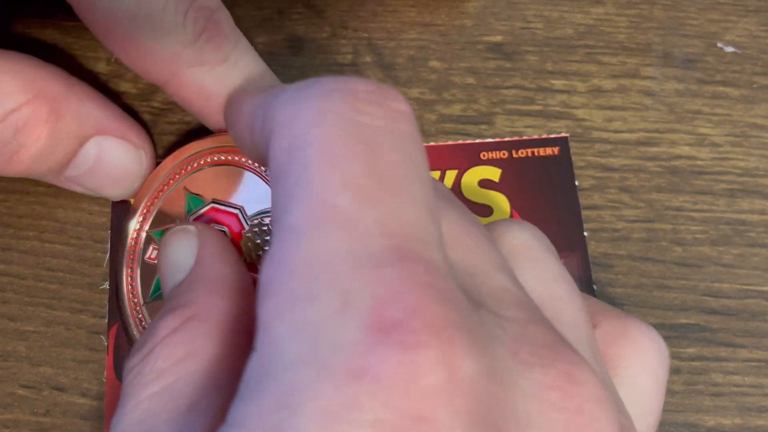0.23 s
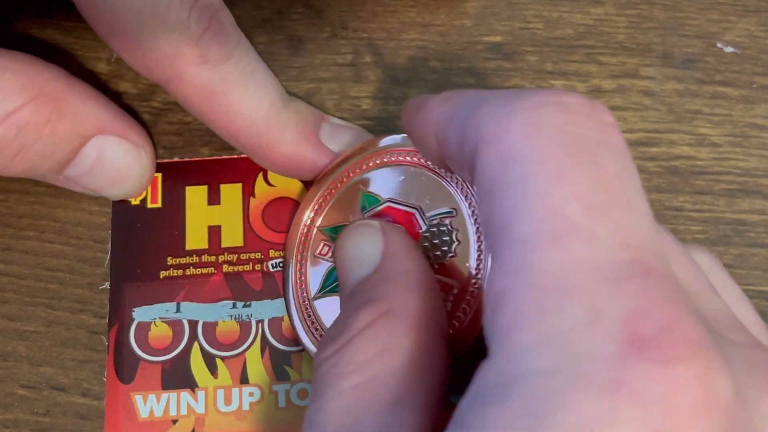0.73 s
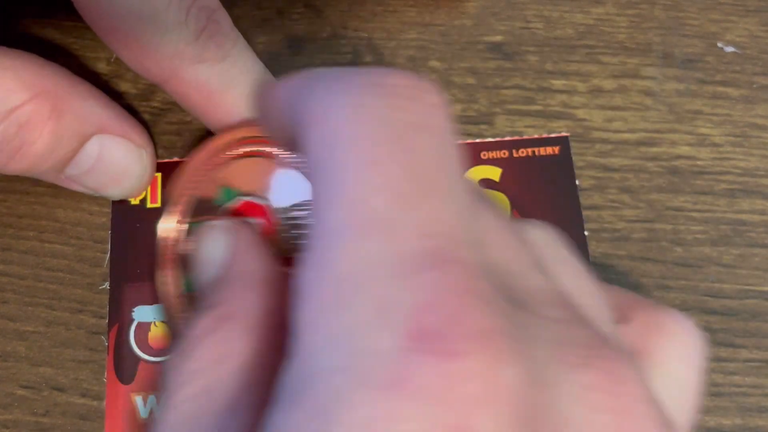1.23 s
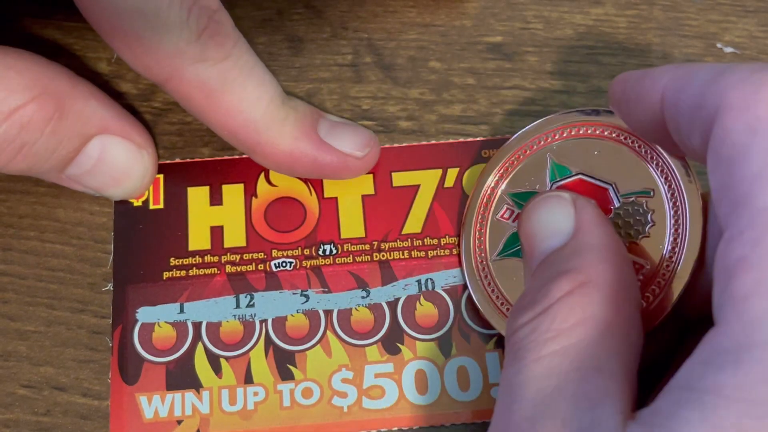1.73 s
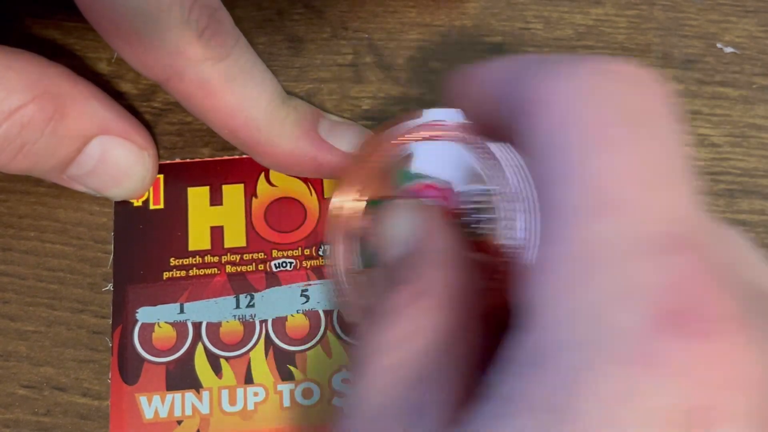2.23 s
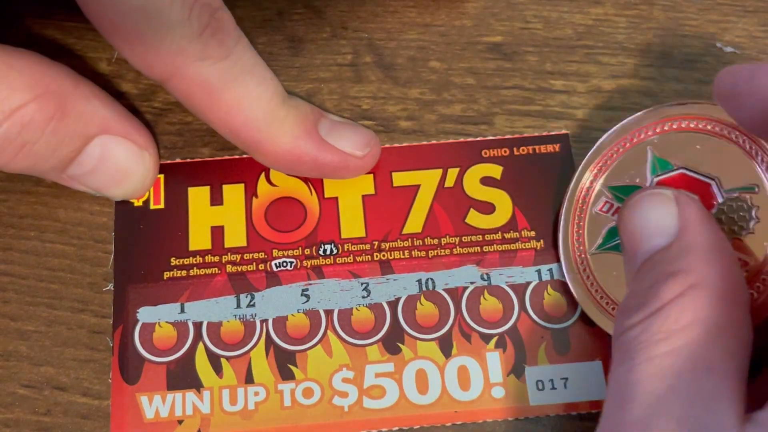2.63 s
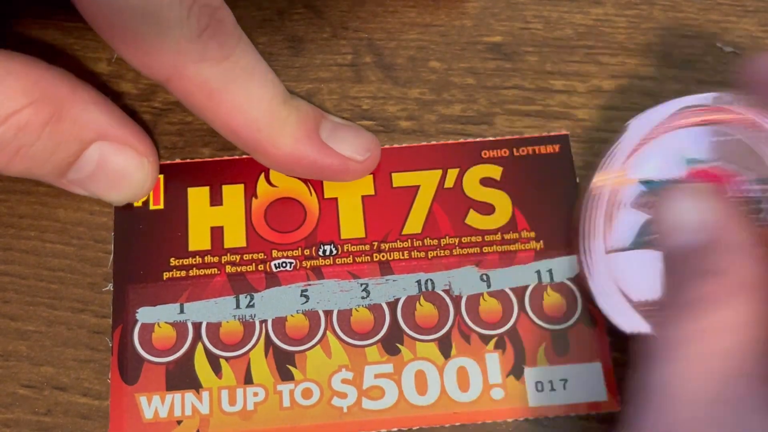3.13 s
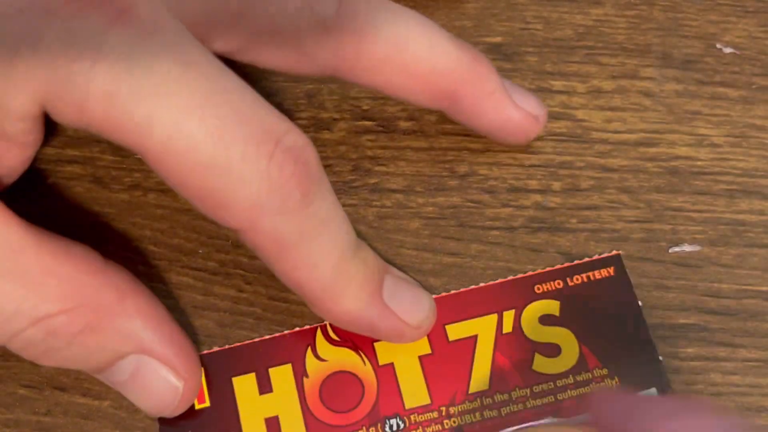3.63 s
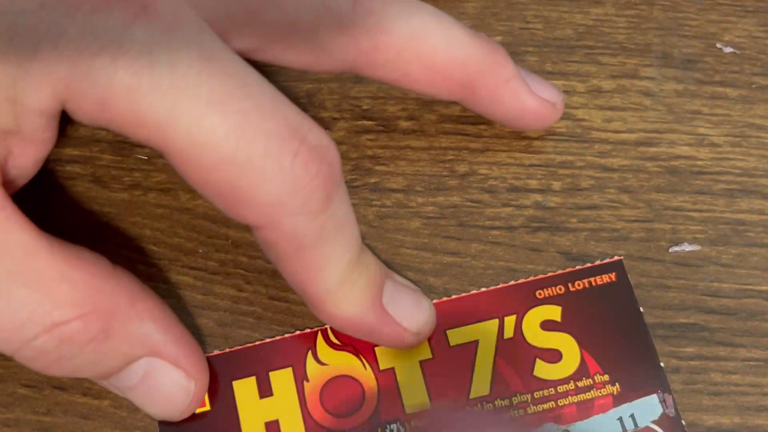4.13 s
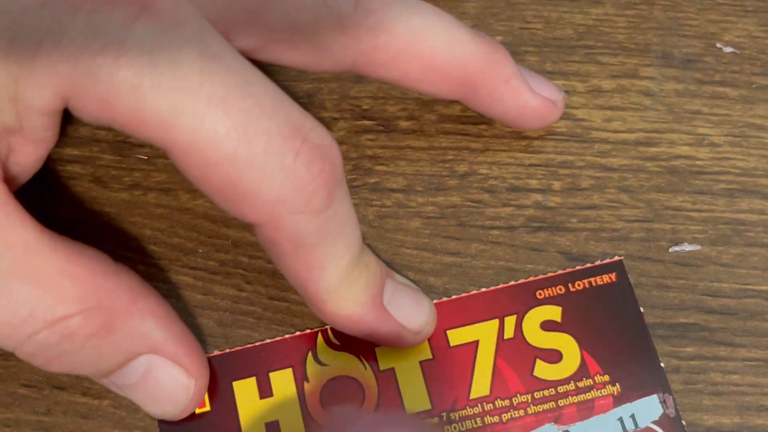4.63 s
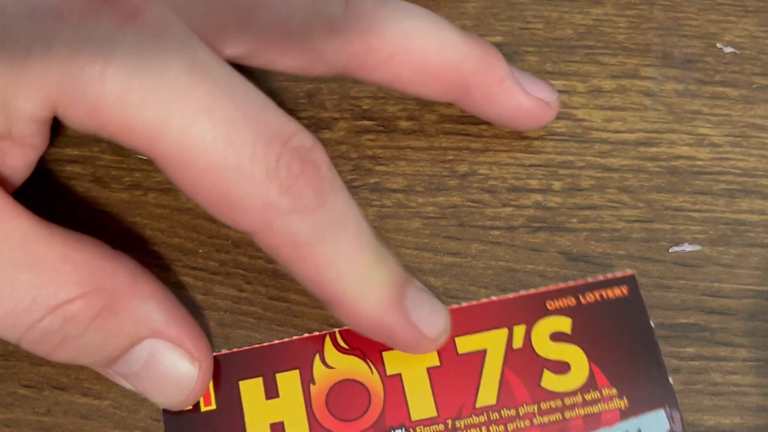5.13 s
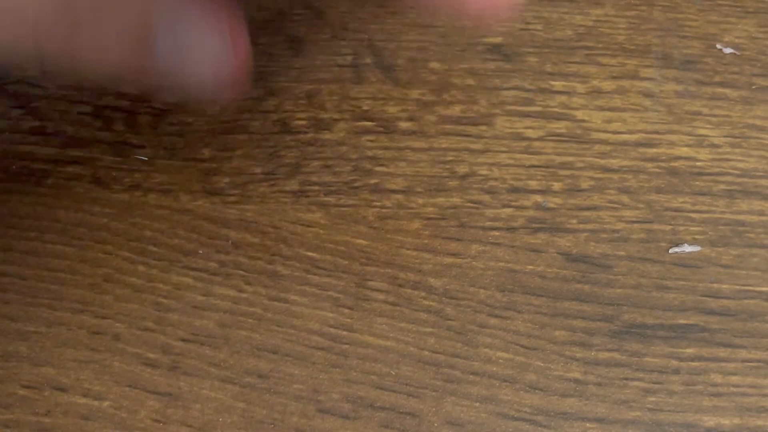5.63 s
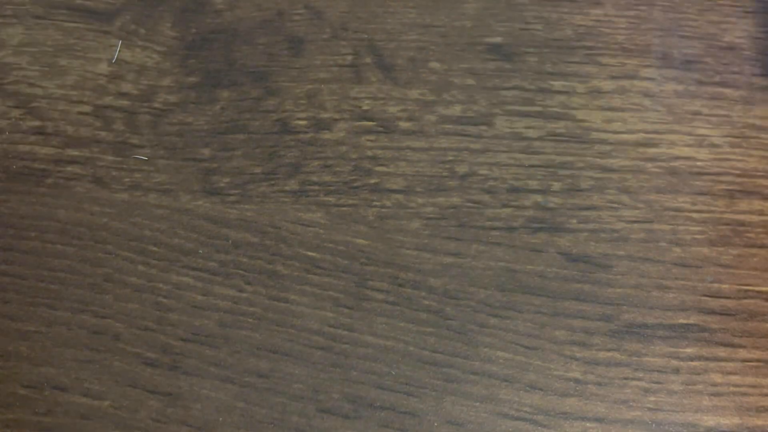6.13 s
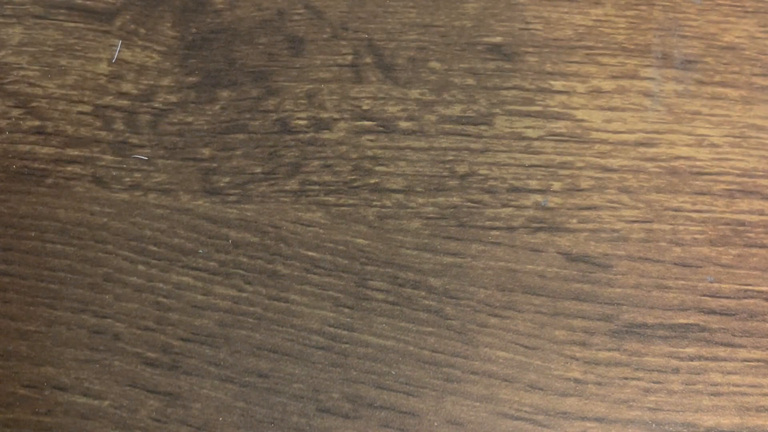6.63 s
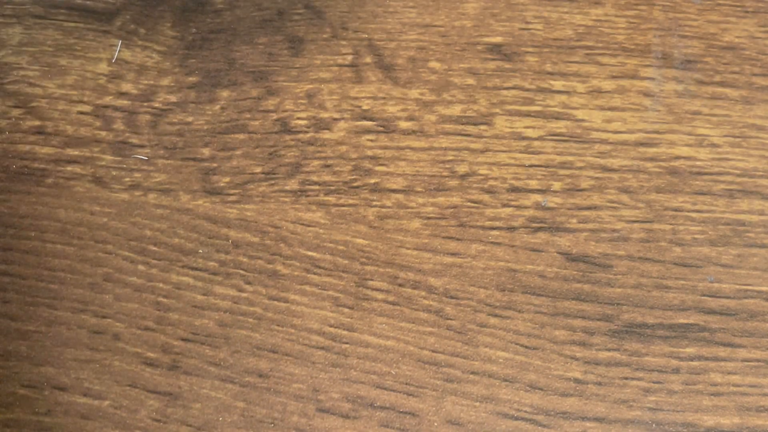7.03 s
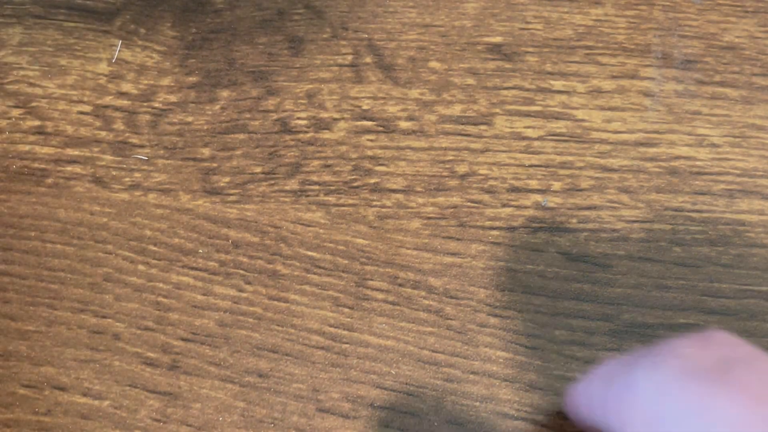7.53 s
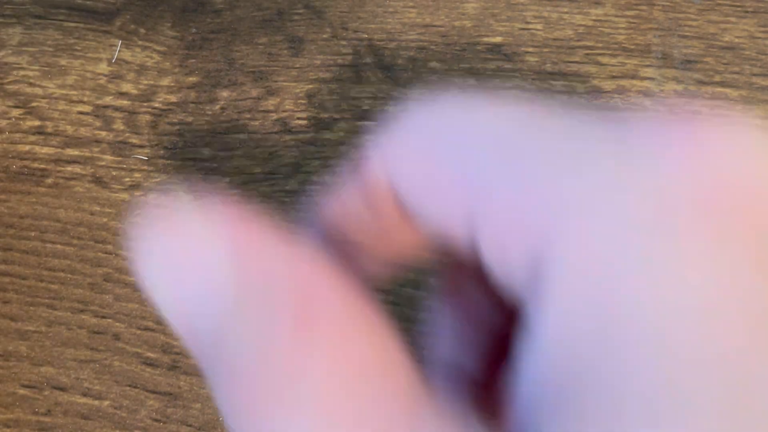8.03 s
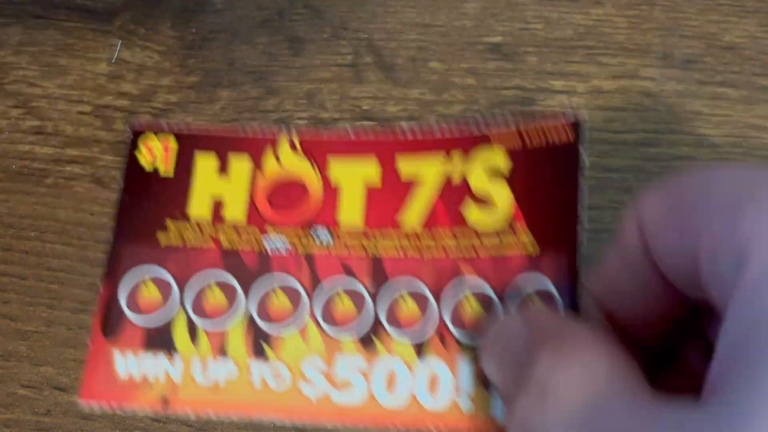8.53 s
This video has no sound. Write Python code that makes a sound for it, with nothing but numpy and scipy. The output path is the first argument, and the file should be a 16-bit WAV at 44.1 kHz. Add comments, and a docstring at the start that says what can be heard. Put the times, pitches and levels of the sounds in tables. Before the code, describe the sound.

Close stereo pickup in a small room with a faint, swelling low rumble. From 0.4 s a large coin makes a long, dry, grainy sweep across a card ticket on a wooden table. A strong woody knock lands at 1.1 s, followed by two more sweeps at 1.2 and 1.4 s, a soft thud at 2.05 and another sweep at 2.15. Short scrubs at 2.7-3.1 s have a hollow drone; the card shifts and a knock falls at 3.5. From 3.6 to 4.9 s come quick, gritty, regular scrubs, about eight a second. Soft knocks and papery crackle follow near 5.3. At 5.6-6.1 s the card swishes away, hiss falling, with clicks. A hard double clack at 6.35 leaves a very faint ring. Quiet brushing and ticks fill 6.8-7.9; a new card flexes at 8.2, slides in at 8.5 and snaps flat brightly at 8.6, then near quiet.

```python
"""In a small room with a low rumble, a large coin scrapes a card ticket on a wooden table, close to the microphones.
Long sweeps, then quick scrubs: random slips drive narrow peaks of coin, card, table and microphone ports.
Knocks are noise bursts through the table's modes behind a bright tick. Slides are grainy noise with a gliding
swish and comb, flexes are papery bursts of slips, squeaks and the after-ring are sines. The ticket is slid away,
something hard is put down with a clack, and a new ticket is slid in and snaps flat."""
import sys
import numpy as np
from scipy import signal
from scipy.fft import rfft, irfft, next_fast_len
from scipy.io import wavfile
from scipy.ndimage import map_coordinates

SR = 44100
rng = np.random.default_rng(int(sys.argv[2]) if len(sys.argv) > 2 else 0)


def generate_wav(sig):
    """Save sig (samples, or channels by samples) to the path in sys.argv[1] as 16-bit PCM at SR."""
    pcm = np.round(np.clip(np.atleast_2d(sig).T, -1, 1) * 32767).astype(np.int16)
    wavfile.write(sys.argv[1], SR, pcm)


N = 387506

# resonances of the table top: (centre [Hz], width [Hz], lift [dB])
TABLE_RESONANCES = [(116, 41, 11.5), (237, 220, 5), (319, 106, 9), (419.6, 13, 10), (527, 82, 10.5),
                    (697, 32, 6.5), (872, 25, 6.5), (1104, 63, 6.5), (1280, 6.7, 12), (1635, 330, 2.5)]
# low, middle and high register of a contact sound: (lower edge [Hz], upper edge [Hz])
BANDS = [(200, 750), (750, 2200), (2200, 8500)]


def amp(db):
    """Decibels to gain."""
    return 10 ** (np.asarray(db) / 20)


def rms(x):
    """Root mean square."""
    return np.sqrt(np.mean(x ** 2) + 1e-20)


def along(points, hz):
    """Joins (frequency [Hz], value) points with lines on a log frequency axis."""
    f, v = np.transpose(points)
    return np.interp(np.log(hz + 1), np.log(f + 1), v)


def wobble(rate, n):
    """A smooth random curve of n samples, with rate knots a second."""
    knots = rng.standard_normal(int(n * rate / SR) + 4)
    return map_coordinates(knots, [np.arange(n) * rate / SR])


def filtered(x, response):
    """Multiplies the spectrum of x by a response of frequency."""
    n = x.shape[-1]
    padded = next_fast_len(n + 8192)
    spectrum = rfft(x, padded) * response(np.fft.rfftfreq(padded, 1 / SR))
    return irfft(spectrum, padded)[..., :n]


def band_rms(x, lo, hi):
    """Level of x between two frequencies."""
    return rms(filtered(x, lambda hz: (hz > lo) & (hz < hi)))


def body(colour, modes, hz):
    """Gain of a broad colour with resonances standing on it."""
    lifts_db = sum(lift / (1 + (2 * (hz - centre) / width) ** 2) for centre, width, lift in modes)
    return amp(along(colour, hz) + lifts_db)


def causal(gain, size=8192):
    """Minimum-phase impulse response with the given gain of frequency."""
    cepstrum = irfft(np.log(gain(np.fft.rfftfreq(size, 1 / SR)) + 1e-6))
    # fold the cepstrum forward in time, so that nothing sounds ahead of its cause
    cepstrum[1:size // 2] *= 2
    cepstrum[size // 2 + 1:] = 0
    return irfft(np.exp(rfft(cepstrum)))


def glide(rise, hold, fall):
    """Speed of a hand movement, 0 to 1: it speeds up, holds and slows (lengths in s)."""
    length = rise + hold + fall
    t = np.arange(int(length * SR)) / SR
    ramp = np.minimum(t / rise, (length - t) / fall)
    return np.sin(np.pi / 2 * np.clip(ramp, 0, 1))


def add(out, s, sound):
    """Mixes a sound into out from time s on."""
    span = out[int(s * SR):][:len(sound)]
    span += sound[:len(span)]


def slips(n, per_s, smooth, flutter_db):
    """Friction force: tiny slips of uneven size on a smooth drag, with a fine fast flutter."""
    jerks = (rng.random(n) < per_s / SR) * rng.standard_normal(n)
    force = jerks / rms(jerks) + smooth * rng.standard_normal(n)
    return force * amp(flutter_db * wobble(256.2, n))


def registers(sound, bands):
    """Splits a sound into neighbouring parts, each of rms 1 within its band."""
    below = [filtered(sound, lambda hz: 1 / (1 + (hz / hi) ** 8)) for lo, hi in bands[:-1]]
    parts = np.diff([0 * sound, *below, sound], axis=0)
    return np.array([part / band_rms(part, *band) for part, band in zip(parts, bands)])


def diffuse(pair):
    """Two unrelated signals, used as mid and side, become sound that arrives from all around."""
    # width of the diffuse sound: (frequency [Hz], side against mid [dB])
    spread = [(60, -17), (250, -10.5), (500, -4.5), (750, 0.5), (1200, -3), (2000, -15.5), (4000, -12),
              (12000, -23)]
    side = filtered(pair[1], lambda hz: amp(along(spread, hz)))
    return np.array([pair[0] + side, pair[0] - side])


def background(air_db=-66, rumble_db=-58.0, swell_db=2.5, swell_rate=5, rumble_hz=56, rumble_width_hz=10):
    """Steady room noise under a narrow low rumble that swells and ebbs by chance."""
    # colour of the room noise: (frequency [Hz], gain [dB])
    air_colour = [(25, -30.5), (66, 1), (120, -16), (200, -22.5), (900, -39.5), (2200, -49.5), (4500, -60),
                  (10400, -55.5), (13000, -76.5)]
    low_cut = lambda hz: 1 / (1 + (75 / (hz + 1)) ** 4)
    air = filtered(rng.standard_normal((2, N)), lambda hz: amp(along(air_colour, hz)) * low_cut(hz))
    air *= amp(air_db) / band_rms(air[0], 120, 2000)
    rumble = filtered(rng.standard_normal(N), lambda hz: 1 / (1 + ((hz - rumble_hz) / rumble_width_hz) ** 4))
    rumble *= amp(swell_db * wobble(swell_rate, N))
    return diffuse(air) + rumble * amp(rumble_db) / rms(rumble)


def flexing(rise_share=0.16):
    """The stiff card buckles in a short papery burst of slips."""
    # the card crackles under the fingers, or buckles as the coin catches it or it is picked up or laid down:
    # (start [s], length [s], level [dB])
    flexes = [(0.165, .01, -64.5), (0.228, 0.021, -65), (0.263, 0.015, -60), (4.339, 0.017, -38),
              (5.214, .01, -66), (5.286, 0.083, -59), (5.378, 0.083, -63), (8.213, 0.047, -48),
              (8.35, 0.018, -52), (8.48, 0.023, -60)]
    # colour of the buckling card: (frequency [Hz], gain [dB])
    flex_colour = [(180, -28), (669, -9), (1000, 1), (2050, -7), (3230, -18), (4610, -18), (5300, -24),
                   (12000, -20.5), (15600, -67.5)]
    out = np.zeros(N)
    ring = causal(lambda hz: amp(along(flex_colour, hz)))
    for start, length, level_db in flexes:
        speed = glide(rise_share * length, 0, (1 - rise_share) * length)
        force = slips(SR, per_s=1100, smooth=1.0, flutter_db=0.5)[:len(speed)] * speed
        burst = signal.fftconvolve(force, ring)
        add(out, start, burst * amp(level_db) / rms(burst[:len(speed)]))
    return out


def ripple(hz, depth_db, count=90):
    """Each spot on the table favours its own frequencies, mostly among the wood's low modes."""
    knots = np.linspace(np.log(100), np.log(SR / 2), count)
    chance = np.interp(np.log(hz + 1), knots, rng.standard_normal(count))
    return amp(depth_db * chance / (1 + (hz / BANDS[1][1]) ** 2))


def stroke(speed, levels_db, colour, peaks, dig_db, chatter_db, drone_power=0.5, grit_power=1.12,
           peak_drift=0.012, peak_uneven_db=2.2, wander_db=1.63, wander_rate=25, chatter_rate=150):
    """One scrape with levels for table drone, rasp and grit; grit grows faster with speed than the others."""
    n = len(speed)
    # the coin travels from one spot of the table to another, and its colour shifts on the way
    travel = np.linspace(0, 1, n)
    sound = np.zeros(n)
    for nearness in (1 - travel, travel):
        # the narrow peaks shift together in pitch, and each one's lift varies by chance
        drift = 1 + peak_drift * rng.standard_normal()
        shifted = [(hz * drift, width, lift + rng.normal(0, peak_uneven_db)) for hz, width, lift in peaks]
        modes = list(TABLE_RESONANCES) + shifted
        ring = causal(lambda hz: body(colour, modes, hz) * ripple(hz, depth_db=3.5))
        force = np.sqrt(nearness) * slips(n, per_s=4500, smooth=0.58, flutter_db=1.7)
        sound += signal.fftconvolve(force, ring)[:n]
    drive = amp(levels_db)[:, None] * [speed ** drone_power, speed ** drone_power, speed ** grit_power]
    # the coating is uneven, so the three registers wander apart
    uneven_db = wander_db * np.array([wobble(wander_rate, n) for band in BANDS])
    # the rasp chatters, and digging in trades drone for grit
    dug_db = dig_db * (2 * travel - 1)
    shifts_db = np.array([-dug_db, chatter_db * wobble(chatter_rate, n), dug_db])
    drive = drive * amp(uneven_db + shifts_db)
    return (drive * registers(sound, BANDS)).sum(axis=0)


def scraping(sweep_table_db=-5.5, sweep_grit_db=-5, table_per_pressure=0.47, turn_share=0.35):
    """Pressure brings out the grit: the sweeps run evenly, while in each scrub the edge digs in as it goes."""
    # long sweeps of the coin along the strip:
    # (start [s], rise [s], hold [s], fall [s], rasp level [dB], pressure [dB])
    sweeps = [(0.375, 0.056, 0.24, 0.037, -51, -4), (1.209, 0.095, 0.02, 0.091, -50, 1.5),
              (1.386, 0.065, 0.16, 0.08, -49.5, -3), (2.148, 0.11, 0.073, 0.11, -50.5, 5)]
    # broad colour of the sweeps: (frequency [Hz], gain [dB])
    sweep_colour = [(70, -15), (250, -11), (1200, 1.5), (2200, -9.5), (4000, -18.5), (6000, -15),
                    (8500, -18.5), (9800, -7), (10700, -7.5), (11400, -45), (13500, -41)]
    # narrow peaks of the sweeps, shifted a little at random: coin and card, and near 10.4 kHz
    # the microphone ports: (centre [Hz], width [Hz], lift [dB])
    sweep_peaks = [(1010, 350, 2.6), (2020, 150, 5.7), (2690, 280, 8.7), (3300, 550, 7.6),
                   (4710, 310, 16.6), (5380, 440, 7.7), (7220, 250, 15.5), (10406, 540, 19.3)]
    # back-and-forth scrubs: (start [s], length [s], table drone [dB], rasp [dB], grit [dB])
    scrubs = [(2.684, 0.09, -48, -57.5, -55.5), (2.809, 0.09, -48, -50, -53),
              (2.942, 0.096, -47, -57.5, -64), (3.039, 0.076, -59, -63.5, -75),
              (3.611, 0.087, -52.5, -52.5, -64), (3.676, 0.074, -50.5, -52, -50.5),
              (3.804, 0.12, -58, -52.5, -48.5), (3.966, 0.11, -50, -53.5, -47.5),
              (4.103, 0.095, -57, -55, -52), (4.237, 0.11, -50, -51.5, -50),
              (4.375, 0.083, -53.5, -52, -48), (4.508, 0.096, -49.5, -52.5, -51),
              (4.636, 0.088, -52, -52, -48.5), (4.761, 0.091, -49, -50.5, -53.5),
              (4.868, 0.082, -57.5, -65.5, -65.5)]
    # broad colour of the scrubs, with the coin gripped more steeply: (frequency [Hz], gain [dB])
    scrub_colour = [(70, -14), (200, -18.5), (1200, -1), (2200, -5), (8500, -1), (11200, -1.5),
                    (13500, -19)]
    # narrow peaks of the scrubs, shifted a little at random: coin and card, and near 10.4 kHz
    # the microphone ports: (centre [Hz], width [Hz], lift [dB])
    scrub_peaks = [(1650, 65, 4.2), (2630, 420, 5.3), (3460, 460, 8.8), (4650, 430, 13), (5570, 510, 3.6),
                   (7240, 350, 8.3), (9450, 620, 10.2), (10414, 430, 28)]
    out = np.zeros(N)
    for start, rise, hold, fall, level_db, pressure_db in sweeps:
        # table drone and grit are set against the rasp, and pressure lifts both
        table_db = sweep_table_db + table_per_pressure * pressure_db
        levels_db = level_db + np.array([table_db, 0, sweep_grit_db + pressure_db])
        speed = glide(rise, hold, fall)
        add(out, start, stroke(speed, levels_db, sweep_colour, sweep_peaks, dig_db=0.0, chatter_db=2.5))
    for start, length, *levels_db in scrubs:
        speed = glide(turn_share * length, (1 - 2 * turn_share) * length, turn_share * length)
        add(out, start, stroke(speed, levels_db, scrub_colour, scrub_peaks, dig_db=1.0, chatter_db=0.7))
    return out


def squeaks(waver=0.0072, sag_hz_per_s=1100):
    """Short thin wavering sines that sag a little in pitch."""
    # faint squeaks in the pauses: (start [s], length [s], pitch halfway [Hz], peak level [dB])
    squeak_list = [(0.946, 0.096, 3180, -81), (2.5, 0.12, 2900, -78), (5.154, 0.082, 3200, -81)]
    out = np.zeros(N)
    for start, length, pitch_hz, level_db in squeak_list:
        swell = glide(length / 2, 0, length / 2)
        t = np.arange(len(swell)) / SR - length / 2
        hz = (pitch_hz - sag_hz_per_s * t) * (1 + waver * wobble(200, len(t)))
        add(out, start, amp(level_db) * swell * np.sin(2 * np.pi * np.cumsum(hz) / SR))
    return out


def tick(tick_t60=0.013, rattle=0.027, rattle_t60=0.23):
    """The bright crack of a contact with a faint rattle after it; its first 6 ms have rms 1 in the high register."""
    # colour of the crack: (frequency [Hz], gain [dB])
    tick_colour = [(300, -5), (1200, -20), (2800, -1.5), (6000, -2), (9000, 4.5), (10400, 8.5), (12000, -2),
                   (15500, -30)]
    t = np.arange(SR // 3) / SR
    decay = amp(-60 * t / tick_t60) + rattle * amp(-60 * t / rattle_t60)
    burst = rng.standard_normal(len(t)) * decay
    crack = signal.fftconvolve(burst, causal(lambda hz: amp(along(tick_colour, hz))))[:len(t)]
    return crack / band_rms(crack[:int(.006 * SR)], *BANDS[2])


def knocks(lag=0.00037, early_cycles=29, late=0.22, late_t60=0.17):
    """A tick comes straight from the contact; slower bending waves follow and scatter among the table's edges."""
    # hard contacts with the table: (time [s], thud level [dB], contact sharpness [Hz], tick level [dB])
    contacts = [(1.0697, -32, 954, -50), (2.054, -41, 374, -70), (2.637, -50.5, 620, -65),
                (2.977, -46.5, 600, -70), (3.490, -37, 615, -51.5), (5.294, -47, 780, -72),
                (5.387, -53, 900, -55), (6.3453, -42.5, 1390, -54), (6.3552, -39.5, 1350, -45),
                (6.763, -57.5, 740, -62), (8.456, -52.5, 910, -67), (8.594, -49.5, 790, -32.5)]
    # light clicks of an edge catching, too slight to move the table: (time [s], tick level [dB])
    clicks = [(2.801, -63), (3.175, -66), (3.797, -60), (4.34, -51), (5.813, -45), (5.90, -50),
              (6.397, -53.5), (7.40, -55), (7.468, -56.5), (7.669, -54), (8.374, -64)]
    # broad colour of the struck table: (frequency [Hz], gain [dB])
    table_colour = [(30, -47), (100, 1), (300, -3.5), (950, 1.5), (1900, 1), (3000, 0.5), (9000, -44)]
    out, t = np.zeros(N), np.arange(SR // 3) / SR
    for s, level_db, contact_hz, crack_db in contacts:
        decay = amp(-60 * t * contact_hz / early_cycles) + late * amp(-60 * t / late_t60)
        push = rng.standard_normal(len(t)) * decay
        # a soft contact misses the high modes and rings longer, a light sharp one misses the low modes
        high_loss = lambda hz: 1 + (hz / (1.4 * contact_hz)) ** 6
        low_loss = lambda hz: 1 + (.22 * contact_hz / (hz + 1)) ** 4
        contact = lambda hz: 1 / np.sqrt(high_loss(hz) * low_loss(hz))
        wood = causal(lambda hz: body(table_colour, TABLE_RESONANCES, hz) * contact(hz))
        thud = signal.fftconvolve(push, wood)[:len(t)]
        # the thud level holds over its first 30 ms
        add(out, s + lag, thud * amp(level_db) / rms(thud[:int(.03 * SR)]))
        add(out, s, tick() * amp(crack_db))
    for s, crack_db in clicks:
        add(out, s, tick() * amp(crack_db))
    return out


def sliding(swish_db=8, swish_octaves=1.0, comb_db=1.0, comb_teeth=1.1, rub_power=1.56, hiss_power=2.53):
    """Card fibres brush over the wood; the air gap under the card adds a swish and a comb that glide together."""
    # card, coin or skin sliding over the table; the lighter it lies, the higher its low edge:
    # (start [s], rise [s], fall [s], hiss level [dB], rub level [dB],
    #  swish at the start [Hz], swish at the end [Hz], low edge [Hz])
    slides = [(1.921, 0.091, 0.14, -65.5, -58.5, 3800, 3680, 253),
              (3.19, 0.075, 0.19, -63, -54.5, 5900, 5850, 258),
              (5.24, 0.21, 0.93, -68.5, -67.5, 9600, 6100, 277),
              (5.58, 0.33, 0.16, -44.5, -56.5, 7600, 2200, 840),
              (5.96, 0.064, 0.081, -53, -58, 2800, 2635, 830),
              (6.353, 0.01, 0.036, -48.5, -62, 6900, 6000, 800),
              (6.45, 0.023, 0.16, -70.5, -90, 9100, 7940, 300),
              (6.755, 0.01, 0.33, -65, -69, 3740, 3040, 700),
              (7.142, 0.17, 0.22, -59.5, -73.5, 8200, 8500, 794),
              (7.431, 0.055, 0.27, -64, -77.5, 8900, 6400, 800),
              (7.6, 0.1, 0.22, -57, -78, 3420, 3000, 1180), (7.634, 0.098, 0.14, -50, -73, 8900, 7860, 810),
              (8.25, 0.051, .12, -59.5, -67, 8000, 8900, 810),
              (8.445, 0.028, .12, -60, -67, 1210, 3600, 710),
              (8.46, 0.11, 0.04, -50.5, -59.5, 2400, 4360, 217),
              (8.586, 0.038, 0.67, -71.5, -79, 5330, 4500, 400)]
    # broad colour of the sliding card: (frequency [Hz], gain [dB])
    card_colour = [(200, 19), (700, -3), (1000, -3), (1500, -5.5), (7000, -7), (10300, 2), (11500, -6),
                   (12600, -22), (14000, -51)]
    out = np.zeros(N)
    ring = causal(lambda hz: body(card_colour, TABLE_RESONANCES[4:], hz))
    bands = [(BANDS[0][0], BANDS[1][1]), BANDS[2]]
    for start, rise, fall, hiss_db, rub_db, first_hz, last_hz, edge_hz in slides:
        speed = glide(rise, 0, fall)
        n = len(speed)
        force = slips(SR, per_s=9000, smooth=0.85, flutter_db=2.03)[:n]
        fibres = signal.fftconvolve(force, ring)[:n]
        hz, frames, z = signal.stft(fibres, SR, nperseg=512)
        # frequency against the gliding centre of the swish
        ratio = (hz[:, None] + 1) / np.geomspace(first_hz, last_hz, len(frames))
        hump_db = swish_db * np.exp(-(np.log2(ratio) / swish_octaves) ** 2)
        teeth_db = comb_db * np.cos(2 * np.pi * comb_teeth * (ratio - 1))
        z = z * amp(hump_db + teeth_db)
        z = z / (1 + (edge_hz / (hz[:, None] + 1)) ** 6)
        brushed = signal.istft(z, SR, nperseg=512)[1][:n]
        rub, hiss = registers(brushed, bands)
        add(out, start, rub * amp(rub_db) * speed ** rub_power + hiss * amp(hiss_db) * speed ** hiss_power)
    return out


def after_ring(clack_s=6.3555):
    """Faint decaying sines ring on after the clack."""
    # what rings on: (frequency [Hz], starting level [dB], t60 [s])
    tones = [(678, -76, 23), (1615, -85, 1.5)]
    out, t = np.zeros(N), np.arange(N) / SR
    add(out, clack_s, sum(amp(db - 60 * t / t60) * np.sin(2 * np.pi * hz * t) for hz, db, t60 in tones))
    return out


def room(x, delay=0.002):
    """The small room's short diffuse tail: noise whose lows ring longest and whose top dies first."""
    # decay of the room: (frequency [Hz], t60 [s])
    room_t60 = [(100, 0.97), (500, 0.26), (1500, 0.33), (5000, 0.24), (10000, 0.15)]
    hz, t, z = signal.stft(rng.standard_normal((2, SR // 2)), SR, nperseg=256)
    decay = amp(-60 * t / along(room_t60, hz)[:, None])
    tail = signal.istft(z * decay, SR, nperseg=256)[1]
    # silent for one delay, then fading in over another
    tail *= np.clip(np.arange(tail.shape[1]) / SR / delay - 1, 0, 1)
    return diffuse(signal.fftconvolve(x[None], tail / np.linalg.norm(tail[0]), axes=1)[:, :N])


def scene(scrape_room_db=-6.5, slide_room_db=-10, knock_room_db=-10):
    """Everything happens on the table just ahead of the microphones."""
    scrapes = scraping()
    slides = sliding() + flexing()
    hits = knocks()
    wet = room(amp(scrape_room_db) * scrapes + amp(slide_room_db) * slides + amp(knock_room_db) * hits)
    return scrapes + slides + hits + after_ring() + squeaks() + wet + background()


def record(dry, lean_db=2.37, top_hz=15900):
    """The two microphone ports differ in phase towards the treble; the mids lean right; nothing passes top_hz."""
    # phase between the ports: (frequency [Hz], lead of the left port [rad])
    port_phase = [(2200, 0), (3100, -.6), (7000, -.6), (8100, -.95), (8800, 0), (9500, 1.9), (10400, 3.1),
                  (11400, 5.3), (15500, 12.8)]

    def ports(hz):
        half = along(port_phase, hz) / 2
        # (Hz, share of lean_db taken from the left and given to the right)
        lean = lean_db * along([(200, 0.11), (700, 0.57), (2000, 0.073)], hz)
        pair = np.array([amp(-lean) * np.exp(1j * half), amp(lean) * np.exp(-1j * half)])
        # a positive lead goes wholly to the left port
        return pair * np.exp(1j * np.maximum(half, 0))

    return filtered(dry, lambda hz: ports(hz) * (hz < top_hz))


dry = scene()
out = record(dry)
generate_wav(out)
```